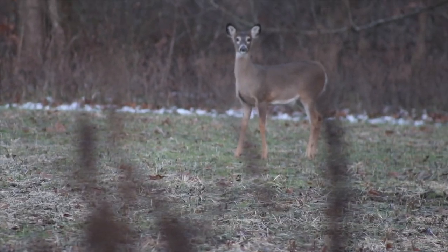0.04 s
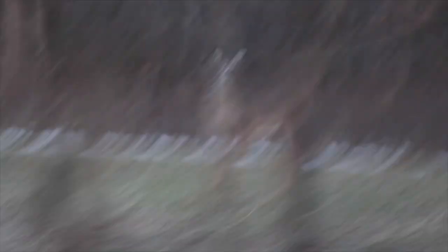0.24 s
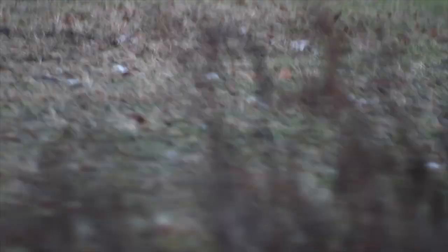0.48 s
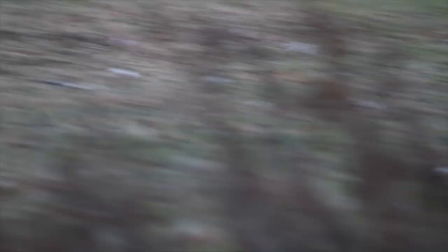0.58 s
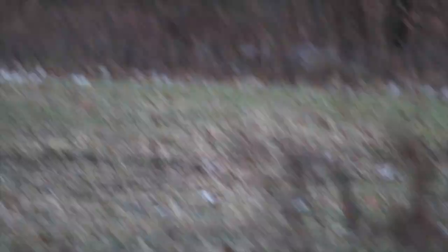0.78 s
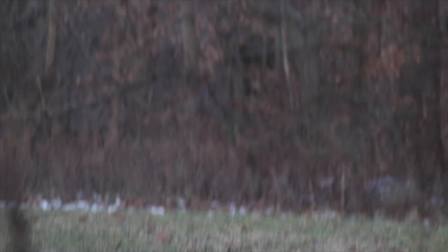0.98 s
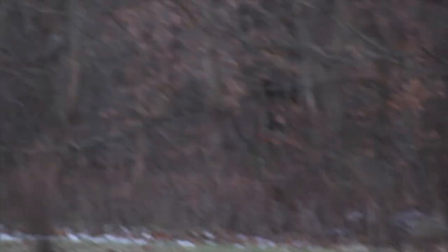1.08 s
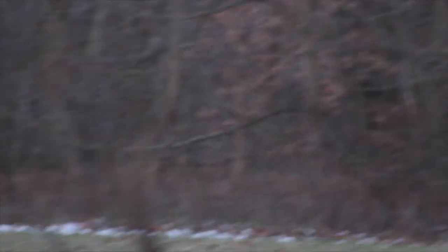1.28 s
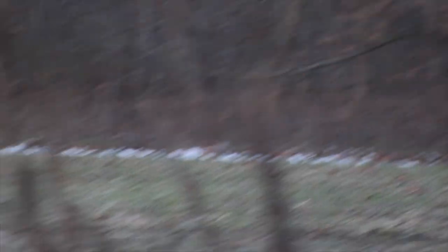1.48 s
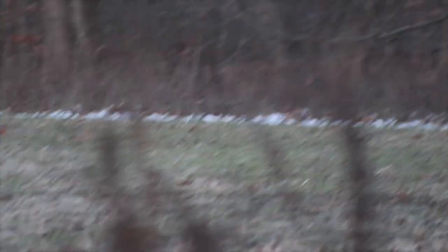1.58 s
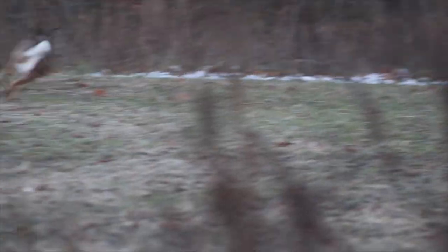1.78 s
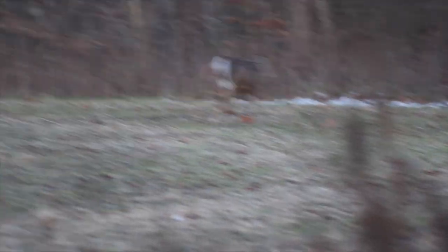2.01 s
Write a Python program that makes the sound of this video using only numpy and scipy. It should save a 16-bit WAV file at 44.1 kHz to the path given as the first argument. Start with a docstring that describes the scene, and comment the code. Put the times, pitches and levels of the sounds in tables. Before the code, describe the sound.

At the edge of an open field by woods, one rifle blast distorts the close microphone, followed by a harsh burst of reflections, a sharp snap, ragged slaps from trunks, and a dulling echo with faint late ticks.

```python
"""At the edge of an open field, a rifle fires close to the microphones and overloads them.
Brush close by throws the report back as a bright roar, made from grainy noise.
Single trunks return short pitched slaps; the far wood sends low thumps and a long echo the air dulls.
A hard crack cuts in after the shot, and a few faint ticks come near the end, over a soft hiss."""
import sys
import numpy as np
from scipy import signal
from scipy.io import wavfile

SR = 44100
rng = np.random.default_rng(int(sys.argv[2]) if len(sys.argv) > 2 else 0)


def unload_wav(signal):
    """Save mono or channel-first audio to the path in sys.argv[1] as 16-bit WAV at rate SR, clipped to [-1, 1]."""
    wavfile.write(
        sys.argv[1],
        SR,
        np.round(np.clip(np.atleast_2d(signal).T, -1, 1) * 32767).astype(np.int16),
    )


N = 90404  # length in samples

# the muzzle wave and its first great return: start_s, level_db, length_s, low_edge_hz
BLASTS = [(.1998, 2.5, .005, 500), (.242, 2, .006, 200)]
# loudness of the roar from the brush: time_s, level_db
BRUSH_LEVEL = [(.2, -12), (.21, -13), (.238, -11.5), (.244, -2.5), (.26, -3.5), (.29, -1), (.33, -8),
               (.36, -10.5), (.378, -9), (.4, -12.5), (.46, -17.5), (.57, -29.5), (.63, -20.5), (.74, -34),
               (.9, -42.5), (1.3, -68)]
# tone of the roar: pitch_hz, relative_level_db
BRUSH_TONE = [(24, -55.5), (40, -21), (259, -11), (575, 0), (720, -1.5), (1280, -0.5), (2000, -3),
              (2560, -3), (4660, -14), (11200, -19), (15400, -38)]
# how fast each pitch of the roar fades beyond its loudness curve: pitch_hz, extra_loss_db_per_s
BRUSH_AIR = [(100, -1.5), (1000, -13), (4000, 0.5), (8000, 26.5), (12000, 49), (15000, 67)]
# slaps off single trunks: peak_s, level_db, pitch_hz, left_over_right_db
SLAPS = [(0.2243, -7, 1700, -2), (0.3741, -3.5, 660, 0.0), (0.383, -5.5, 1380, -2.5),
         (0.4306, -10.5, 1400, -4.0), (0.4351, -10.5, 1000, -2.0), (0.4388, -7.5, 1070, -4.5),
         (0.4471, -10.5, 2360, -3.5), (0.4902, -9.5, 2110, -4.5), (0.5032, -9.5, 750, 0.0),
         (0.5083, -7.5, 860, -2.5), (0.5986, -5.5, 1280, -1.0), (0.6035, -5.5, 1300, -1.5),
         (0.6079, -6.5, 1430, -1.5), (0.6166, -11, 1460, -2), (0.6278, -0.5, 1010, -2.0),
         (0.6389, -6.5, 1590, -3.0), (0.654, -14, 2000, -2), (0.664, -13, 2600, -2), (0.668, -11, 1300, -2),
         (0.6769, -6.5, 1170, -1.0), (0.682, -4.5, 1160, -2.5), (0.6877, -11.5, 1730, -0.5),
         (0.6935, -12, 2800, -1), (0.6994, -8.5, 1480, -3.0), (0.7255, -13, 1900, -1),
         (0.7288, -6.5, 1240, -0.5), (0.7392, -4.5, 1290, -3.0), (0.7617, -10.5, 990, -3.5),
         (0.7992, -12.5, 1210, -2.5), (0.8116, -13.5, 1400, 1.0), (0.8349, -13.5, 1070, 1.0),
         (0.852, -13.5, 1040, 0.5), (0.8637, -9.5, 1080, 1.5), (0.8911, -15.5, 1290, 1.0),
         (0.8957, -15.5, 1150, 2.0), (0.9209, -20.5, 1680, -1.0), (0.9249, -16.5, 1130, 1.0),
         (0.932, -15.5, 1080, -1.0), (0.9991, -16.5, 1080, 0.5), (1.014, -15.5, 1450, -4.5),
         (1.0382, -16.5, 1180, -1.0), (1.1684, -19.5, 1350, -2.0), (1.2026, -24.5, 1120, -2.0),
         (1.2486, -23.5, 1110, -0.5), (1.3171, -27.5, 1040, -1.5), (1.3489, -23.5, 1140, -2.5)]
# loudness of the far wood's rolling echo: time_s, level_db
WOOD_LEVEL = [(.3, -15), (.45, -23), (.52, -18.5), (.58, -21.5), (.65, -20), (.75, -18), (.85, -21.5),
              (.95, -24.5), (1.1, -26.5), (1.4, -33.5), (1.7, -40.5), (2.05, -49)]
# tone of the rolling echo: pitch_hz, relative_level_db
WOOD_TONE = [(59, -60), (100, -24.5), (159, -13.5), (241, -14.5), (301, -28), (477, -8), (631, -8),
             (1080, 0), (1330, -1.5), (1790, -9.5), (2470, -11), (9250, -57.5), (12000, -62.5),
             (15600, -94.5), (22000, -120)]
# how fast each pitch of the echo fades beyond its loudness curve: pitch_hz, extra_loss_db_per_s
WOOD_AIR = [(100, -8.5), (400, -3), (1000, 0), (3000, 9.5), (6000, 31.5), (15000, 46)]
# low thumps from the far wood: peak_s, level_db, pitch_hz
THUMPS = [(0.248, -18.5, 150), (.303, -27.5, 190), (0.374, -23, 175), (0.687, -31.5, 165), (0.78, -55, 207),
          (0.868, -31.5, 199), (1.006, -33.5, 190), (1.043, -34, 193), (1.355, -46.5, 201),
          (1.713, -59, 167), (1.887, -52, 172)]
# how alike left and right are in the far echo: pitch_hz, likeness (1 = the same, 0 = unrelated)
LIKENESS = [(60, 0.97), (130, 0.99), (290, 0.92), (640, 0.65), (1410, 0.46), (3090, 0.15), (6800, -0.04),
            (15000, -0.11)]
# faint ticks: start_s, level_db
TICKS = [(1.29, -57), (1.523, -54), (1.754, -52), (1.762, -55), (1.783, -52)]
# tone of the microphone hiss: pitch_hz, relative_level_db
HISS_TONE = [(150, -8), (330, 0), (1000, -6), (3000, -16), (5000, -19), (8000, -16), (11500, -17),
             (15000, -26)]

SHOT_S = .1998
SNAP_S, SNAP_DB, SNAP_HZ, SNAP_LENGTH_S, SNAP_FIZZ_DB = .4864, 8, 3000, .0016, -2
BRUSH_LIKENESS = .4  # multiplies the likeness table
BRUSH_PAN_DB, WOOD_PAN_DB = -2.5, -1.5  # left over right
BRUSH_LAG = 6  # samples by which the left comes later
BRUSH_LOW_CUT_HZ, FAR_LOW_CUT_HZ = 51, 103.6
SLAP_RISE_S, SLAP_LAG_S = .001, 4e-5  # the lag makes the left come later
SLAP_ROUGH, SLAP_TAIL = .75, .65  # share of roughness; a tail below 1 fades slower than the rise
SLAP_TOP_HZ, SLAP_DULL = 2524, .42  # treble limit at 1 s, and how steeply it falls with time
THUMP_RISE_S = .00754
HISS_DB, RUMBLE_DB, RUMBLE_TOP_HZ = -68.5, -68, 90
TOP_EDGE_HZ = 15600


def amp(db):
    """Turns decibels into a plain multiplier."""
    return 10 ** (np.asarray(db) / 20)


def read(points, hz):
    """Reads a table between its points, along a logarithmic pitch scale."""
    point_hz, value = np.transpose(points)
    return np.interp(np.log(hz + 1), np.log(point_hz + 1), value)


def pan(db):
    """Splits a left-over-right difference evenly between the two sides."""
    return np.array([[db / 2], [-db / 2]])


def add(mix, start_s, sound):
    """Lays a short sound into the mix at its start time."""
    part = mix[:, round(start_s * SR):][:, :sound.shape[1]]
    part += sound[:, :part.shape[1]]


def band_pass(order, low_hz, high_hz, sound):
    """Keeps the pitches between two edges."""
    sos = signal.butter(order, [low_hz, high_hz], "band", fs=SR, output="sos")
    return signal.sosfilt(sos, sound)


def low_cut(order, hz, sound):
    """Thins the deep bass."""
    return signal.sosfilt(signal.butter(order, hz, "high", fs=SR, output="sos"), sound)


def blast(db, length_s, low_hz):
    """A sharp pressure jump that swings back, with a few ragged milliseconds, far over full scale."""
    t = np.arange(900) / SR
    grit = rng.standard_normal((2, 900))
    ragged = band_pass(1, low_hz, 3000, grit + grit[::-1] * .5)
    u = t / .00046
    ragged = 2 * ragged * np.minimum(u, 1) * np.exp(-(t / length_s) ** 2)
    pressure = (1 - u) * np.exp(-u)
    return amp(db) * (ragged - pressure)


def snap():
    """One hard, bright crack from straight ahead, perhaps the bullet striking: a tone plus fizz."""
    t = np.arange(400) / SR
    shape = np.minimum(t / .0003, 1) * np.exp(-(t / SNAP_LENGTH_S) ** 4)
    fizz = band_pass(1, 3000, 9000, rng.standard_normal((2, 400)))
    return amp(SNAP_DB) * shape * (np.sin(2 * np.pi * SNAP_HZ * t) + fizz * amp(SNAP_FIZZ_DB))


def scatter(spread_db, likeness):
    """Countless small returns: noise whose level jumps in short grains, alike left and right by band."""
    per_s, share = 300, .2  # grains each second; their share of the power
    strike = rng.random(N) < per_s / SR
    size = amp(spread_db * np.minimum(rng.exponential(1, N), 4)) * strike
    power = signal.oaconvolve(size ** 2, np.hanning(130), "same").clip(0)
    level = np.sqrt(1 - share + share * power / np.mean(power))
    noise = rng.standard_normal((2, N)) * level
    hz, t, (left, other) = signal.stft(noise, SR, nperseg=1024, noverlap=768)
    c = np.clip(likeness * read(LIKENESS, hz), -1, 1)[:, None]
    right = c * left + np.sqrt(1 - c ** 2) * other
    return hz, t, np.array([left, right])


def echo(level, tone, air, at_s, pan_db, field):
    """Colours the scatter, lets the air change its tone with time, and shapes its loudness."""
    hz, t, bands = field
    gain = amp(read(tone, hz))[:, None]
    gain = gain / np.sqrt(np.mean(gain ** 2))
    # the tone table holds at at_s; the air's loss counts from there
    air_gain = amp(-read(air, hz)[:, None] * (t - at_s))
    sound = signal.istft(bands * gain * air_gain, SR, nperseg=1024, noverlap=768)[1][:, :N]
    s = np.arange(N) / SR
    shape = amp(np.interp(s, *np.transpose(level))) * (s > level[0][0])
    return sound * shape * amp(pan(pan_db))


def brush_roar():
    """The brush close by scatters the report back as a bright roar, heard first on the right."""
    field = scatter(3.0, BRUSH_LIKENESS)
    left, right = echo(BRUSH_LEVEL, BRUSH_TONE, BRUSH_AIR, .47, BRUSH_PAN_DB, field)
    return low_cut(4, BRUSH_LOW_CUT_HZ, np.array([np.roll(left, BRUSH_LAG), right]))


def slap(peak_s, db, hz, pan_db):
    """A trunk returns a few cycles at one pitch and a ragged tail; the air dulls later tails."""
    lag_s = np.array([[SLAP_LAG_S], [0]])
    u = (np.arange(700) / SR - lag_s) / SLAP_RISE_S - 2  # zero at the peak
    body = np.exp(-np.where(u < 0, u, u * SLAP_TAIL) ** 2)
    body = body * -np.sin(2 * np.pi * hz * u * SLAP_RISE_S + 1)
    grit = rng.standard_normal((2, 700))
    ragged = (grit[:1] + .5 * grit) * np.exp(-np.where(u < 0, u, u * SLAP_TAIL / 2) ** 2)
    top_hz = np.clip(SLAP_TOP_HZ / peak_s ** SLAP_DULL, 1500, 9000)
    ragged = band_pass(2, 900, top_hz, ragged)
    return amp(db + pan(pan_db)) * (body + SLAP_ROUGH * ragged)


def far_wood():
    """The far wood scatters the report back as a long rolling echo, dulled by the air."""
    return echo(WOOD_LEVEL, WOOD_TONE, WOOD_AIR, 1.176, WOOD_PAN_DB, scatter(2.5, 1))


def thump(db, hz):
    """A soft low swell: a tone that rises and dies away, the same in both microphones."""
    u = np.arange(3000) / SR / THUMP_RISE_S
    swell = (u * np.exp(1 - u)) ** 2
    return amp(db) * (swell * np.sin(2 * np.pi * hz * u * THUMP_RISE_S))[None]


def tick(db):
    """A faint treble tick: a burst of noise that dies away quickly."""
    t = np.arange(400) / SR
    treble = band_pass(2, 5000, 9500, rng.standard_normal((2, 400)))
    return amp(db) * treble * np.exp(-t / .0016)


def still_air():
    """Microphone hiss throughout, and a faint low rumble that fades out just after the shot."""
    hz, t, bands = signal.stft(rng.standard_normal((2, N)), SR, nperseg=2048)
    hiss = signal.istft(bands * amp(read(HISS_TONE, hz))[:, None], SR, nperseg=2048)[1][:, :N]
    rumble = band_pass(2, 30, RUMBLE_TOP_HZ, rng.standard_normal(N))
    fade = np.clip((SHOT_S + .1 - np.arange(N) / SR) * 10, 0, 1)
    return amp(HISS_DB) * hiss / hiss.std() + amp(RUMBLE_DB) * rumble / rumble.std() * fade


def scene():
    """Adds the shot, the roar, the slaps, the far echo and the background together."""
    near = brush_roar()
    for start_s, *row in BLASTS:
        add(near, start_s, blast(*row))
    add(near, SNAP_S, snap())

    far = far_wood()
    for peak_s, *row in SLAPS:
        add(far, peak_s - 2 * SLAP_RISE_S, slap(peak_s, *row))
    for peak_s, *row in THUMPS:
        add(far, peak_s - THUMP_RISE_S, thump(*row))
    for start_s, db in TICKS:
        add(far, start_s, tick(db))
    far = low_cut(6, FAR_LOW_CUT_HZ, far)  # a steep low cut, as of the microphone, thins the deep bass
    return near + far + still_air()


def record(dry):
    """The overload cuts peaks flat at full scale; a filter then removes the highest treble."""
    low_pass = signal.firwin(255, TOP_EDGE_HZ, window=("kaiser", 8), fs=SR)
    limited = signal.oaconvolve(np.clip(dry, -1, 1), low_pass[None], "same")
    return np.clip(limited, -1, 1)


dry = scene()
out = record(dry)
unload_wav(out)
```